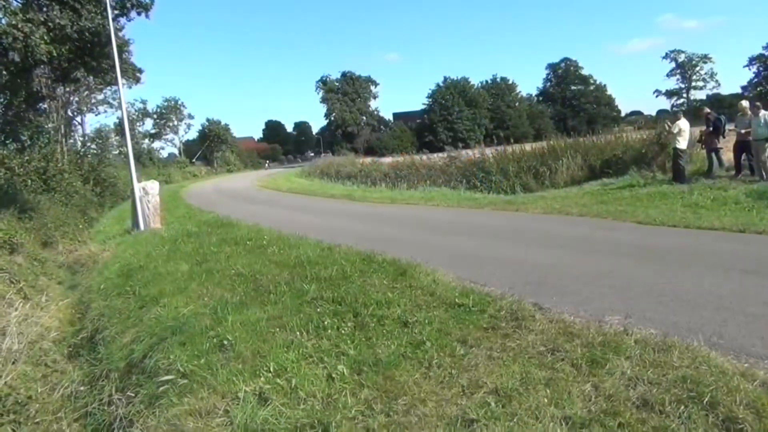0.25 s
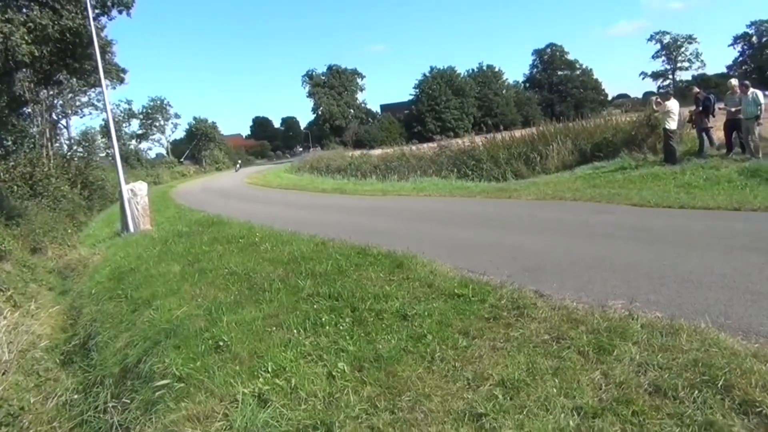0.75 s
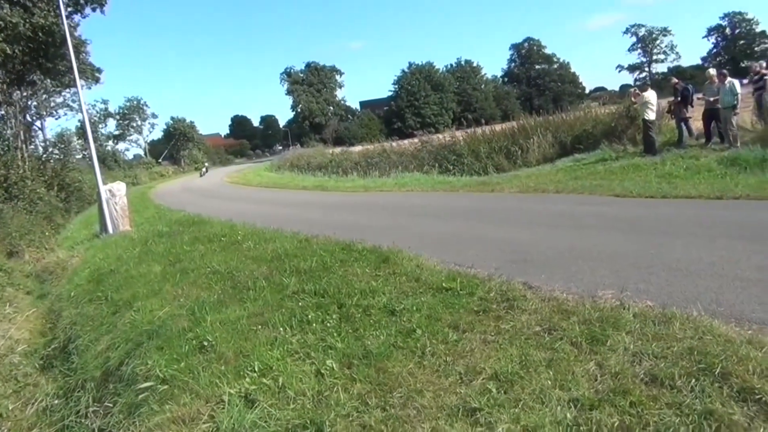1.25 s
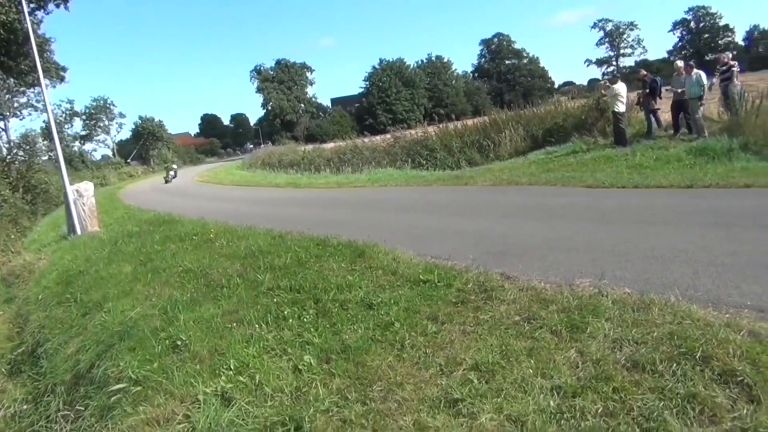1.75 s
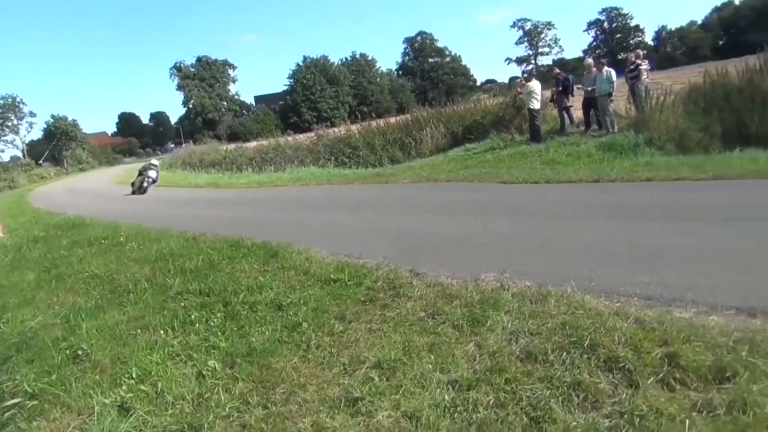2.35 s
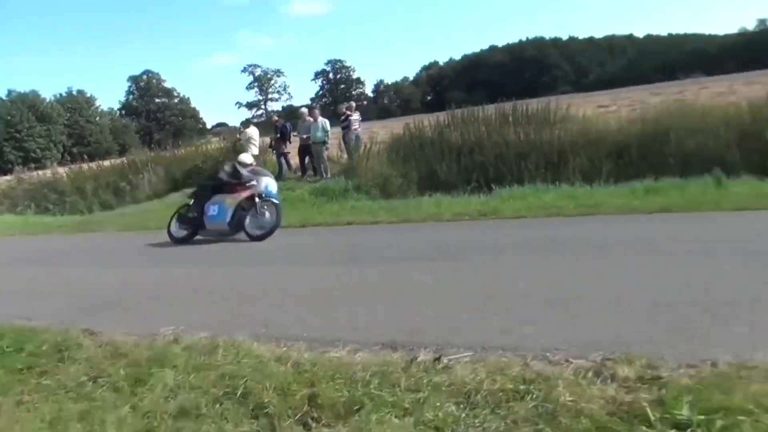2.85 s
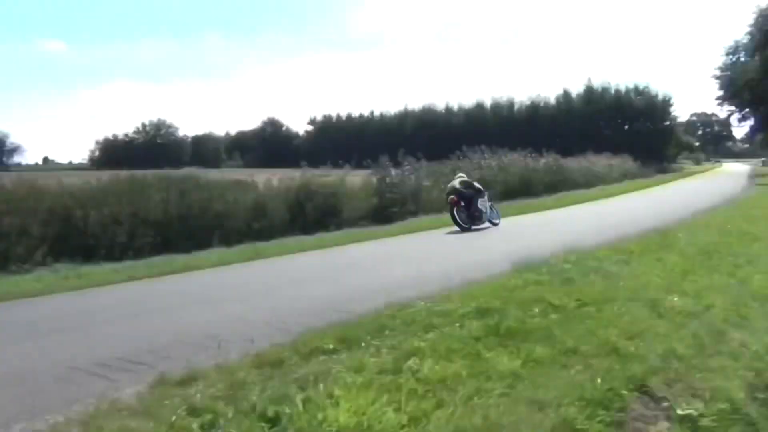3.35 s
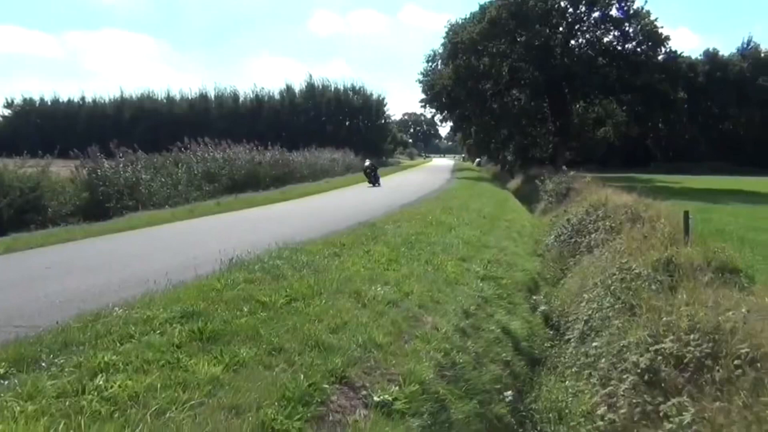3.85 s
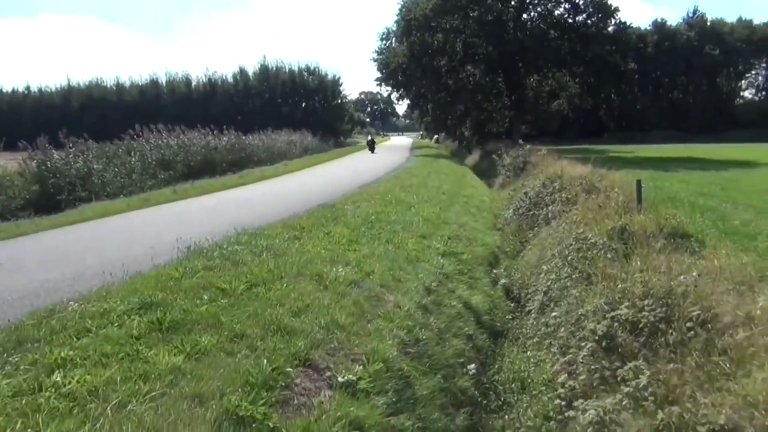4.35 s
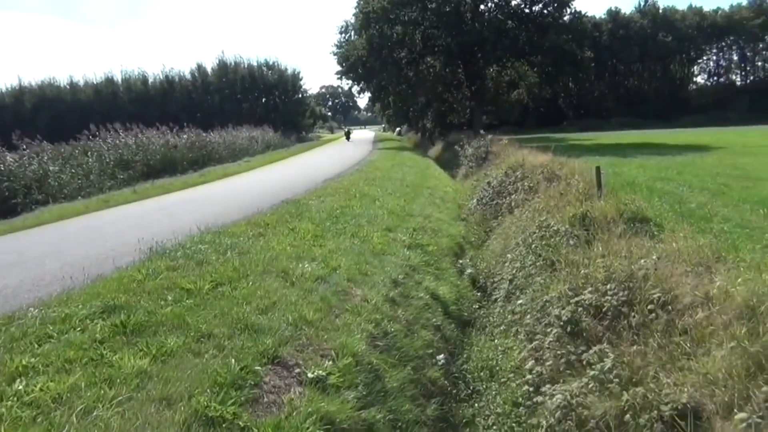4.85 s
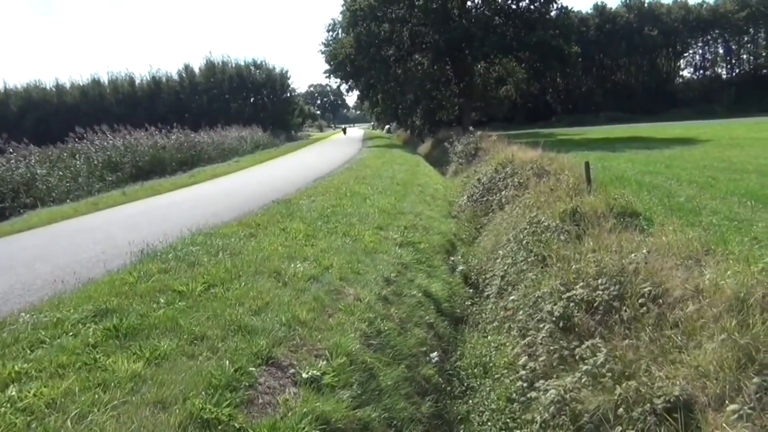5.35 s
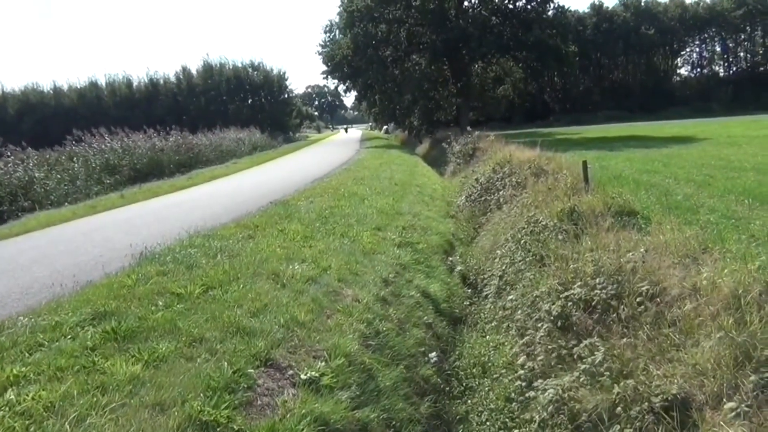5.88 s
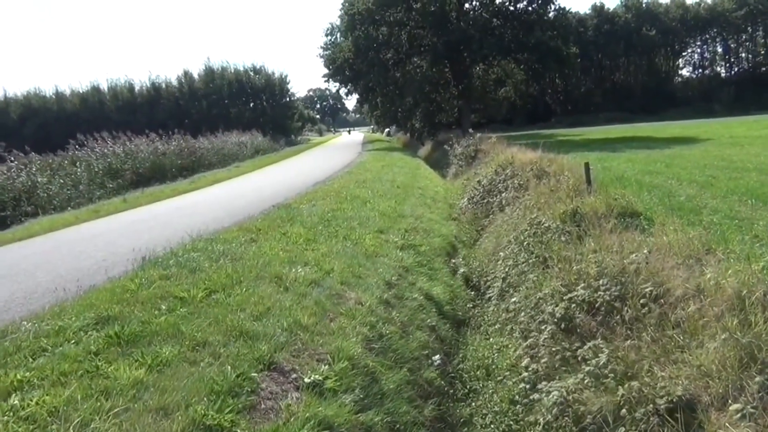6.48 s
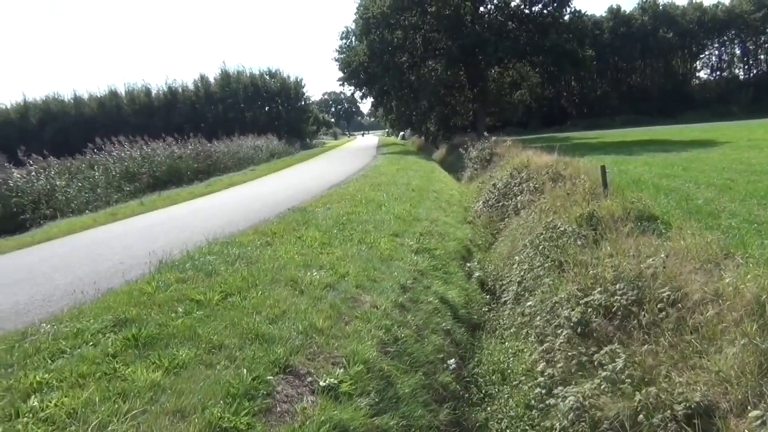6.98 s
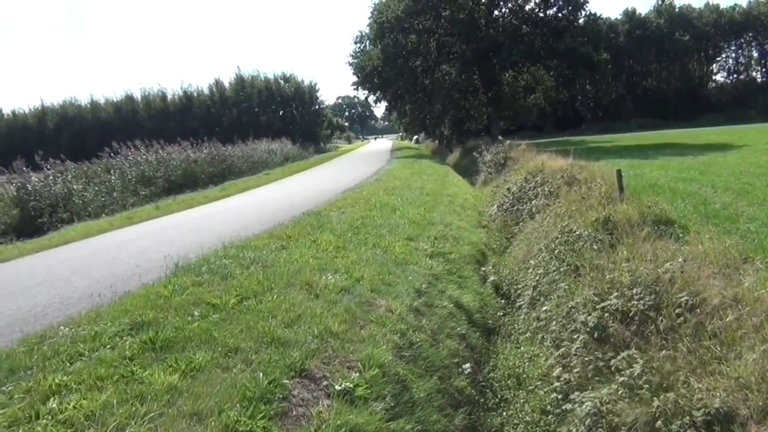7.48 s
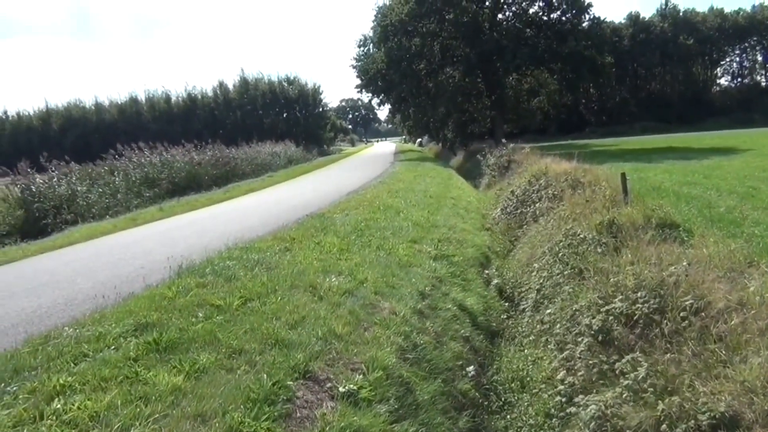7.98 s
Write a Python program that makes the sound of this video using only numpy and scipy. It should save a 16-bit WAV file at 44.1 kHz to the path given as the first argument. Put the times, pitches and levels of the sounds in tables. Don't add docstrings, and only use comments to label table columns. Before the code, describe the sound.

Slow thumping engines with light valve ticking quickly fade beneath wind in the crop. A racing motorcycle's steady high wail swells around the bend, turns into a harsh tearing rasp as it passes, then falls to a lower, wavering drone down the road. A brief throttle cut, crackling pops and a muffled distant note follow. Hedges smear the sound; the narrow microphone pair is bass-light and compresses loud peaks.

```python
import sys
import numpy as np
from scipy import signal
from scipy.fft import rfft, irfft, next_fast_len
from scipy.io import wavfile

SR = 44100
rng = np.random.default_rng(int(sys.argv[2]) if len(sys.argv) > 2 else 0)


def gain_from_db(level_db):
    decades = np.asarray(level_db, float) / 20
    return 10 ** decades


def generate_wav(sig):
    pcm = np.round(np.clip(np.atleast_2d(sig).T, -1, 1) * 32767).astype(np.int16)
    wavfile.write(sys.argv[1], SR, pcm)


N = 362502

# (pulse strength [ratio], lateness [engine cycles], crack level [dB])
CYLINDERS = [(1, -.007, 0), (.99, 0, -3), (1.03, -.002, -1), (1.01, .002, -3)]
# (time [s], speed [engine cycles/s])
CRANK_SPEED = [(0, 66.5), (.92, 66.6), (1, 65.05), (2.5, 67.46), (3.5, 69.44), (4.5, 68.99), (6.6, 71.3),
               (7.605, 71.85), (7.636, 65.8), (7.66, 66.3), (7.686, 69.3), (7.708, 70.4), (7.736, 68.6),
               (7.77, 69.1), (7.88, 69.2), (8.22, 68.5)]
# (time [s], tone level [dB], rasp level [dB],
# range favoured by verge and field [octaves above 250 Hz], share of each pipe's weaker pulse [0-1])
ARRIVAL = [(0, -28, -50, 0.82, .4), (.85, -29, -42, 0.9, 0.34), (1.2, -24, -31.5, 1.29, 0.34),
           (1.62, -18, -32.5, 1.45, 0.46), (2.15, -16.5, -31.5, 1.7, 0.41), (2.62, -18.5, -28, 3.0, 0.48),
           (2.9, -18, -26.5, 2.3, .4), (3.15, -20.5, -23, 1.6, .6), (3.5, -22.5, -20.5, 1.0, 0.7),
           (3.96, -26.5, -20.5, 0.52, 0.6), (4.1, -23, -23, 0.97, 0.56), (4.3, -24.5, -25, 1.0, 0.3),
           (4.62, -21.5, -25, 0.95, 0.5), (5.6, -23, -27, 1.55, 0.38), (6.6, -23, -28.5, 1.75, 0.39),
           (7.6, -23, -29.5, 2.0, 0.25), (7.72, -32, -47, 1.58, 0.4), (8.22, -33, -53, 1.58, 0.4)]
# (frequency [Hz], level [dB])
PIPE_TONE = [(190, 3), (280, -4), (390, -6), (480, 0), (840, 1), (1350, -1.5), (2000, -4.5), (2800, -8.5),
             (4000, -20.5)]
STEEP_FRONT = [(-90, 14.0, .072), (-40, 11.5, .083), (-22, 4.5, .085), (0, 3.0, .1), (25, 6.0, .085),
               (55, 9.5, .078), (92, 11.0, .075), (125, 12.0, .072), (170, 14.0, .063)]
# (time [s], length [s], frequency [Hz], level [dB])
RANGE_SWELLS = [(2.095, 0.2, 1830, 5), (2.552, 0.2, 1306, 8), (3.407, 0.25, 2040, 5), (3.55, 0.25, 760, -7),
                (4.55, 0.25, 497, 4), (8.05, 0.3, 490, -9), (1.7, 0.3, 600, 3), (1.9, 0.6, 1210, -6),
                (5.292, 0.23, 1495, 4.5), (5.735, 0.11, 1638, 4.5), (6.605, 0.1, 2085, 6.5),
                (7.156, 0.082, 2250, 3), (7.392, 0.094, 1654, 2)]
# (frequency [Hz], density [dB per Hz])
CRACK_COLOUR = [(1350, -58), (2300, -0.5), (2370, -2), (2470, 3.5), (2880, 1), (3430, 1.5), (3840, 1),
                (5460, -6.5), (7460, -13), (8890, -23), (9710, -23), (12100, -34), (15600, -43)]
# (time [s], peak level [dB])
BACKFIRES = [
    (7.651, -9),
    (7.658, -8.5),
    (7.669, -6),
    (7.68, -8),
    (7.689, -10),
    (7.7, -13),
]
# (time [s], peak level [dB])
DRY_SNAP = [
    (8.1196, -20),
]
# (frequency [Hz], width [Hz], level [dB])
THUMP_MODES = [(231.8, 81.3, -6.5), (409.6, 194.7, -1.5), (553, 257.5, -6.5), (1578, 1300, -15)]
# (frequency [Hz], width [Hz], level [dB])
TICK_MODES = [(3600, 1035, 1.5), (4250, 500, 4.5), (5400, 1200, -8), (7570, 3700, -27)]
# (frequency [Hz], density [dB per Hz])
SCATTER_COLOUR = [(150, -32), (230, -13), (350, -22.5), (500, -10.5), (800, -7.5), (1200, -4), (2000, -4.5),
                  (3500, -17), (5500, -39.5), (9000, -78)]
# (frequency [Hz], density [dB per Hz])
CROP_COLOUR = [(150, -20.5), (230, -4), (350, -2.5), (600, -3.5), (1200, -4), (2000, -7), (3500, -20.5),
               (6000, -51), (10000, -80)]
# (frequency [Hz], density [dB per Hz])
RUMBLE_COLOUR = [(15, -50), (30, -45), (60, -18), (85, -14), (115, -1), (160, 0.5), (230, -3), (400, -49),
                 (1500, -82.5)]
# (time [s], level [dB])
BACKGROUND_GAIN = [(0, -3.5), (1.0, 2), (1.56, 7), (1.7, 1), (3.4, -13), (5.7, -14.5), (7.6, -8.5),
                   (7.75, 0), (8.22, 0.5)]
# (frequency [Hz], level [dB])
AIMING = [(120, -41), (300, -22.5), (600, -8), (1200, 0.5), (2500, -1.5), (5000, -4), (11000, -5)]
# (frequency [Hz], level [dB])
SIDEWAYS = [(120, -64), (300, -60.5), (700, -38), (1500, -23), (2500, -21), (4000, -22), (9000, -31),
            (13000, -38), (15000, -48)]
# (time [s], left-right difference [dB])
BEARING = [(0.9, 0.5), (2.67, 3.0), (2.9, 2.5), (3.14, 0.5), (4.61, 1.5), (8.22, 1.5)]

SPEED, NEAREST, NEAREST_S = 41.717, 8.345, 3.106
SOUND_SPEED = 343
SHIFT_S = 7.628
LEAVE_S = 0.978


def noise():
    return rng.standard_normal(N)


def columns(rows):
    s, *values = np.transpose(rows)
    return [np.interp(np.arange(N) / SR, s, v) for v in values]


def rms_one(x):
    return x / np.sqrt(np.mean(x ** 2) + 1e-20)


def coarse_drift(rate):
    r = np.exp(-64 * np.pi * rate / SR)
    settled = signal.lfilter([1], [1, -2 * r, r * r], rng.standard_normal(N // 32 + 2002))[2000:]
    return rms_one(settled)


def fine(coarse):
    steps = np.diff(coarse)[:, None] * (np.arange(32) / 32)
    return (coarse[:-1, None] + steps).ravel()[:N]


def drift(rate):
    return fine(coarse_drift(rate))


def butter(x, edge_hz, kind):
    return signal.sosfilt(signal.butter(2, edge_hz, kind, fs=SR, output="sos"), x)


def shaped(x, spectrum):
    hz, db = np.transpose(spectrum)
    size = next_fast_len(N + SR // 10)
    grid = np.maximum(np.arange(size // 2 + 1) * SR / size, 1)
    return irfft(rfft(x, size) * gain_from_db(np.interp(np.log(grid), np.log(hz), db)), size)[:N]


def coloured(x, spectrum):
    return rms_one(shaped(x, spectrum))


def resonate(x, modes):
    out = 0
    for k, (hz, width, db) in enumerate(modes):
        r = np.exp(-np.pi * width / SR)
        poles = [1, -2 * r * np.cos(2 * np.pi * hz / SR), r * r]
        out = out + (-1) ** k * gain_from_db(db) * (1 - r * r) * signal.lfilter([1, 0, -1], poles, x + 1e-18)
    return rms_one(out)


def firings(turns, spread_db):
    at = np.flatnonzero(np.diff(np.floor(turns), prepend=np.floor(turns[0])))
    clicks = np.zeros(N)
    clicks[at] = gain_from_db(spread_db * rng.standard_normal(len(at)))
    return clicks


def passing():
    along = SPEED * (np.arange(N) / SR - NEAREST_S)
    distance = np.hypot(NEAREST, along)
    return distance, along / distance


def microphone_hiss():
    return gain_from_db(-76) * butter(butter(noise(), 9000, "low"), 9500, "low")


def port_wind():
    return gain_from_db(-75.5) * coloured(noise(), [(20, -3), (60, -6.0), (150, -27.5), (400, -74.5)])


def low_rumble():
    (gain_db,), tone_db = columns(BACKGROUND_GAIN), columns(ARRIVAL)[0]
    rumble = gain_from_db(-43.5 + gain_db + 2.5 * drift(4.1)) * coloured(noise(), RUMBLE_COLOUR)
    deep_bass = coloured(noise(), [(20, -2.5), (45, 0), (80, 0.5), (130, -25.5), (300, -77)])
    return rumble + gain_from_db(-42.5 + tone_db) * deep_bass


def crop_wind():
    (gain_db,) = columns(BACKGROUND_GAIN)
    return gain_from_db(-29 + 0.71 * gain_db + 0.94 * drift(4.9)) * coloured(noise(), CROP_COLOUR)


def scattered_exhaust():
    distance, away = passing()
    level_db = columns(ARRIVAL)[0] - 6.5 - 0.07 * distance * (away > 0)
    level_db -= 3 * np.maximum(-away, 0)
    return gain_from_db(level_db + 1.96 * drift(5.2)) * coloured(noise(), SCATTER_COLOUR)


def nearby_engines():
    s = np.arange(N) / SR
    gone = np.log1p(np.exp(np.minimum(5 * (s - LEAVE_S), 50))) / 5
    thump_db, tick_db = -22 - 8 * gone, -32.5 - 26.5 * gone
    chirp_swell = np.exp(-((s - 0.72) / 0.1) ** 2)
    chirp_db = -30.5 - 14 * (1 - chirp_swell) - 26.5 * gone
    t = s - .6612
    ticking = firings(40.1 * t + 100 + .008 * drift(20), spread_db=1.8)
    dull = firings(45.3 * t + 100 + .015 * drift(20), spread_db=2.5)
    gap_echoes = 0.0223 * noise()
    thumps = resonate(butter(1.505 * ticking + 0.9 * dull + gap_echoes, 980, "low"), THUMP_MODES)
    rattle = signal.lfilter([1], [1, -.99], ticking) * noise()
    ticks = resonate(rms_one(rattle) + 0.633 * noise(), TICK_MODES)
    ticks = butter(butter(ticks, 8000, "low"), 8500, "low")
    chirps = resonate(np.roll(ticking, 60), [(1965, 98, 0)])
    chirps = butter(butter(chirps, 3500, "low"), 4000, "low")
    return gain_from_db(thump_db) * thumps + gain_from_db(tick_db) * ticks + gain_from_db(chirp_db) * chirps


def pops(events, low_hz, high_hz, fade):
    clicks = np.zeros(N)
    for s, db in events:
        clicks[round(s * SR)] = gain_from_db(db)
    burst = signal.lfilter([1], [1, -fade], clicks + 1e-18) * noise()
    return butter(butter(burst + 6 * clicks, [low_hz, high_hz], "band"), 0.787 * high_hz, "low")


def road_echo(x, strength):
    distance, _ = passing()
    lag = 2 * 0.42 / distance / SOUND_SPEED * SR
    gain = strength / (1 + (distance / 20) ** 4)
    echo = np.interp(np.arange(N) - lag, np.arange(N), x)
    return (x + gain * echo) / np.sqrt(1 + gain ** 2)


def exhaust_cracks(cycles, weaker_cycles, weaker, crack_db, top_db, highest_db):
    cylinder = np.floor(4 * cycles + 0.12).astype(int) % 4
    fronts = firings(4 * cycles + .03 + .008 * drift(40), spread_db=1.2)
    fronts = fronts * gain_from_db(np.array(CYLINDERS)[cylinder, 2])
    fronts = fronts + weaker * firings(4 * weaker_cycles + .03, spread_db=2.0) * 0.7
    fade = np.exp(-1 / (0.00082 * SR))
    jet = signal.lfilter([1], [1, -fade], fronts) * noise()
    crack = coloured(0.8 * rms_one(fronts) + 0.55 * rms_one(jet) + 0.3 * noise(), CRACK_COLOUR)
    size = next_fast_len(N)
    spectrum = rfft(crack, size)
    octave = np.log2(np.linspace(1, SR / 2, size // 2 + 1))
    centres = np.log2(np.geomspace(2000, 16000, 10))
    bands = []
    for one in np.eye(10):
        band = irfft(spectrum * np.interp(octave, centres, one), size)[:N]
        bands.append(band * gain_from_db(2.29 * drift(3.22)))
    rasp = rms_one(sum(bands[:6]))
    top = rms_one(sum(bands[6:8]) + gain_from_db(highest_db) * sum(bands[8:]))
    return gain_from_db(crack_db) * rasp + gain_from_db(top_db) * top


def order_level(k, s, revs, away, favoured):
    hidden = s > SHIFT_S + .05
    pipe_hz, pipe_db = np.transpose(PIPE_TONE)
    octave = np.log2(k * revs / (1 + SPEED * away / SOUND_SPEED) / 250)
    level_db = np.interp(np.log(k * revs), np.log(pipe_hz), pipe_db) - 24 * (k < 4)
    off_favoured = (octave - favoured) * (1 + hidden) / 0.509
    level_db += (5.0 + 6.5 * hidden) * np.exp(-.5 * off_favoured ** 2)
    level_db -= 6 * np.maximum(-away, 0) * (octave - 1)
    for at, length, hz, db in RANGE_SWELLS:
        moment = np.exp(-.5 * ((s - at) / length) ** 2)
        level_db += db * moment * np.exp(-.5 * ((octave - np.log2(hz / 250)) / .11) ** 2)
    dull_db = -1.5 * SPEED * np.abs(s - NEAREST_S) / 100 - 11 * hidden
    return level_db + dull_db * np.maximum(octave - 2.5, 0)


def exhaust_tones(cycles, revs, pair_lead, away, favoured, weaker):
    wander_db, flutter_db, blur, stray_db = 2.0, 0.2862, 0.0136, -24
    smear = 0.00195
    controls = (revs, pair_lead, away, favoured, weaker)
    revs, pair_lead, away, favoured, weaker = (np.append(v[::32], v[-1]) for v in controls)
    s = np.arange(len(revs)) * 32 / SR
    strength, late, _ = np.transpose(CYLINDERS)
    late = np.arange(4) / 4 + late
    front_order = np.interp(SPEED * (s - NEAREST_S), *np.transpose(STEEP_FRONT)[:2])
    near = .6 * np.sqrt(1 - away ** 2) * np.clip(.7 - 2 * away, 0, 1)
    turn = np.exp(2j * np.pi * cycles)
    wave, out = turn, np.zeros(N)
    for k in range(2, 57):
        wave = wave * turn
        flutter, jitter, wander, stray = (coarse_drift(rate) for rate in (17.9, 24.0, 2.86, 2.615))
        pipes = strength * np.exp(-2j * np.pi * k * late) / 4
        steep = 1 / (1 + (front_order / k) ** 4)
        front = steep * np.exp(2j * np.pi * k * pair_lead)
        pulses = pipes[:2].sum() * (1 + weaker * front)
        pulses = pulses + pipes[2:].sum() * (1 - (1 - weaker) * steep + front)
        pulses = pulses / np.hypot(1, weaker * steep)
        pulses += gain_from_db(stray_db) * min(k / 12, 1) ** 2 * np.exp(2j * stray)
        pulses += near * (k % 4 == 2) * (k > 2)
        level_db = order_level(k, s, revs, away, favoured)
        level_db += flutter_db * np.sqrt(k) * flutter + wander_db * wander * min(k / 16, 1.1)
        phase = 0.364 - smear * k * k + blur * k * jitter
        size = np.sqrt(2) * gain_from_db(level_db) * pulses * np.exp(1j * phase)
        out += fine(size.real) * wave.real - fine(size.imag) * wave.imag
    return out


def throttle_and_hedge():
    s = np.arange(N) / SR
    since = (s - SHIFT_S) / .012
    gain_db = -13 * np.exp(-np.where(since < 0, since ** 2, since / 2.84))
    opens, closes, clear = (np.tanh(30 * (s - at)) / 2 for at in (.13, .43, .95))
    return gain_from_db(gain_db - 10 * (.5 - opens + closes - clear))


def racer():
    (revs,), (distance, away) = columns(CRANK_SPEED), passing()
    tone_db, crack_db, favoured, weaker = columns(ARRIVAL)
    weaker = np.clip(weaker, 0, 1)
    cycles = np.cumsum(revs / (1 + SPEED * away / SOUND_SPEED)) / SR
    pair_lead = np.interp(away * distance, *np.transpose(STEEP_FRONT)[::2])
    tones = exhaust_tones(cycles, revs, pair_lead, away, favoured, .25 * weaker)
    swing = np.sqrt(2) * np.sin(2 * np.pi * (cycles + pair_lead / 2) + np.pi / 4)
    arriving = cycles + pair_lead / 2 * (1 - swing)
    weaker_cycles = cycles + pair_lead / 2 * (1 + swing)
    top_db = crack_db - 6 - 0.1281 * distance - 5 * np.maximum(-away, 0)
    highest_db = 3 - .075 * distance
    cracks = exhaust_cracks(arriving, weaker_cycles, weaker, crack_db, top_db, highest_db)
    return throttle_and_hedge() * (gain_from_db(tone_db) * tones + road_echo(cracks, strength=.3))


def side_signal(bike, scatter, nearby):
    lean = np.tanh(columns(BEARING)[0] * np.log(10) / 40)
    side = shaped(1.15 * lean * (bike + scatter), AIMING)
    side -= shaped(0.209 * nearby, [(100, -24), (300, -12.5), (900, 21.0), (2000, -15.5)])
    hedge_echo = np.roll(bike + nearby, round(.0047 * SR))
    return side + 0.96 * shaped(hedge_echo, SIDEWAYS) + port_wind()


def scene():
    scatter = scattered_exhaust() + crop_wind()
    nearby = nearby_engines()
    bike = racer() + 0.59 * pops(BACKFIRES, 350, 2400, 0.9987) + 12 * pops(DRY_SNAP, 2500, 3210, 0.9765)
    mid = bike + nearby + scatter + low_rumble() + microphone_hiss()
    side = side_signal(bike, scatter, nearby)
    return np.array([mid + side, mid - side])


def low_pass(x):
    return signal.sosfilt(signal.butter(12, 15720, fs=SR, output="sos"), x)


def record(dry):
    limited = np.clip(1.476 * np.tanh(dry / 1.521), -0.9, 0.9)
    cleaned = dry + butter(limited - dry, 110, "high")
    return low_pass(np.clip(cleaned, -1, 1))


dry = scene()
out = record(dry)
generate_wav(out)
```